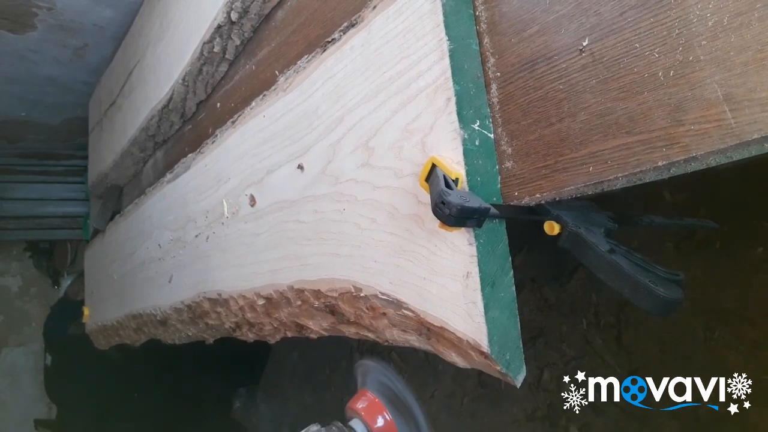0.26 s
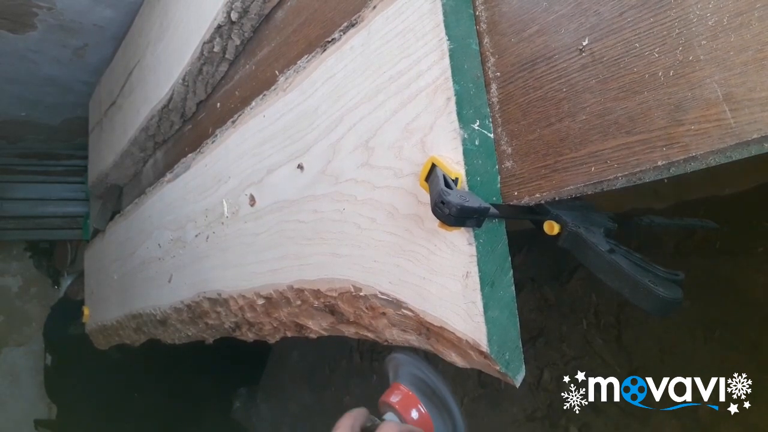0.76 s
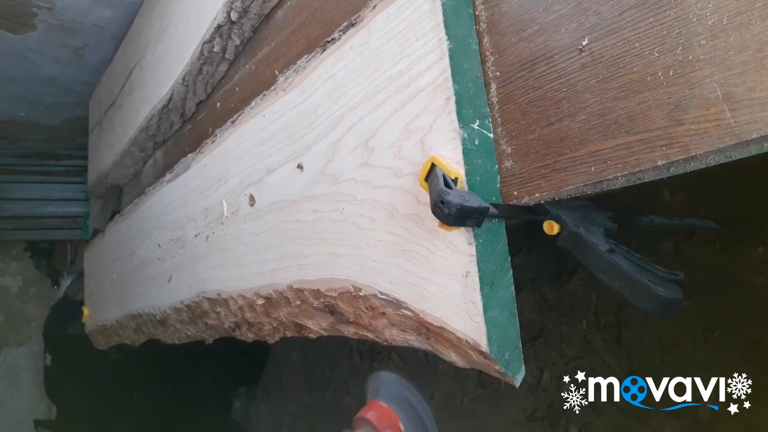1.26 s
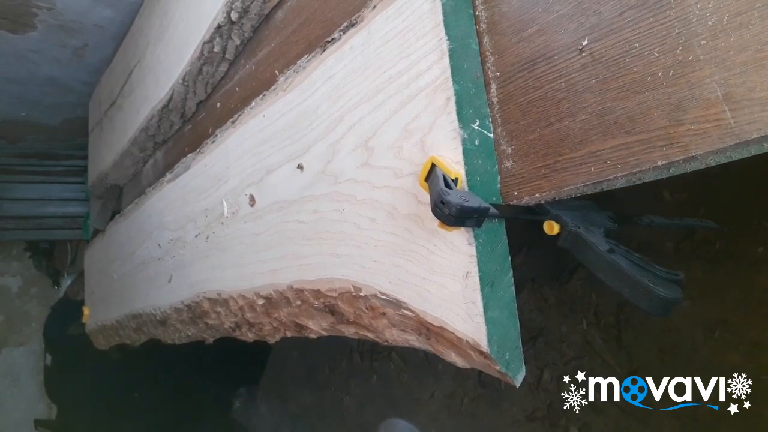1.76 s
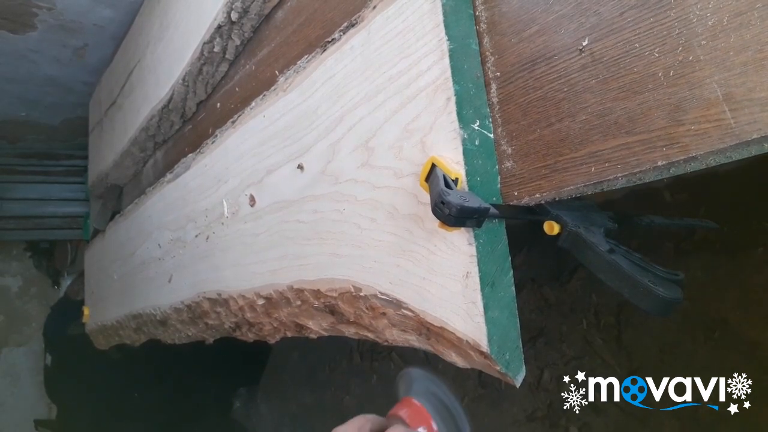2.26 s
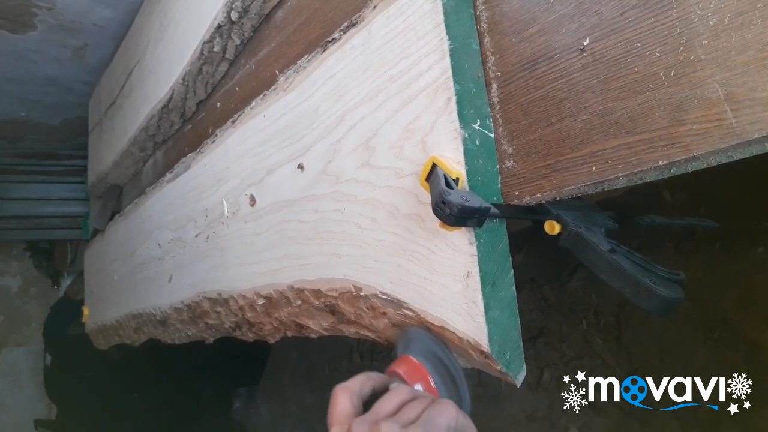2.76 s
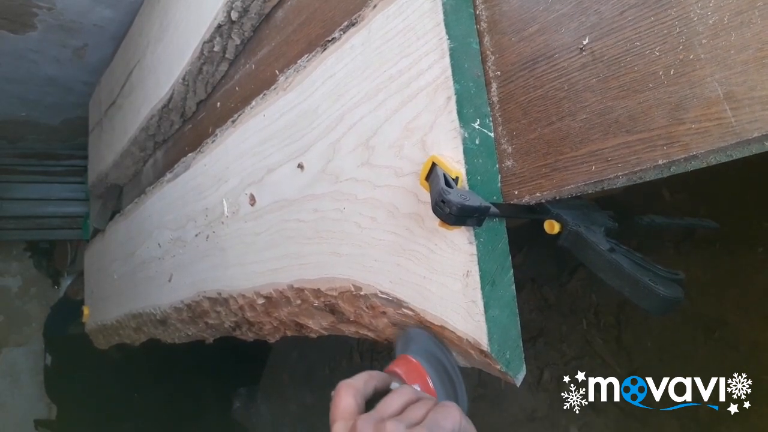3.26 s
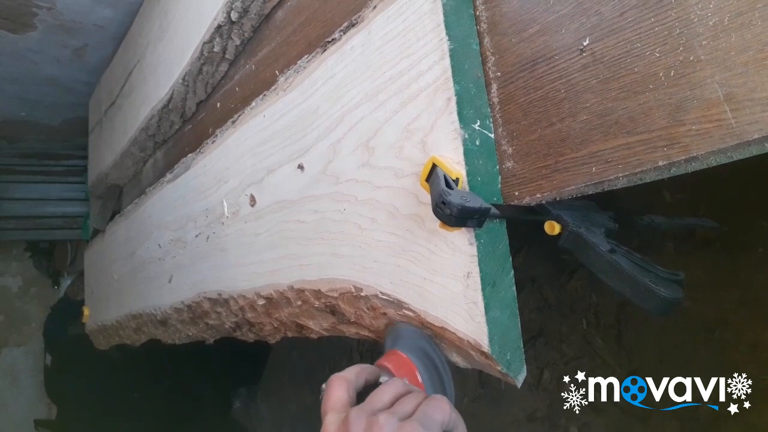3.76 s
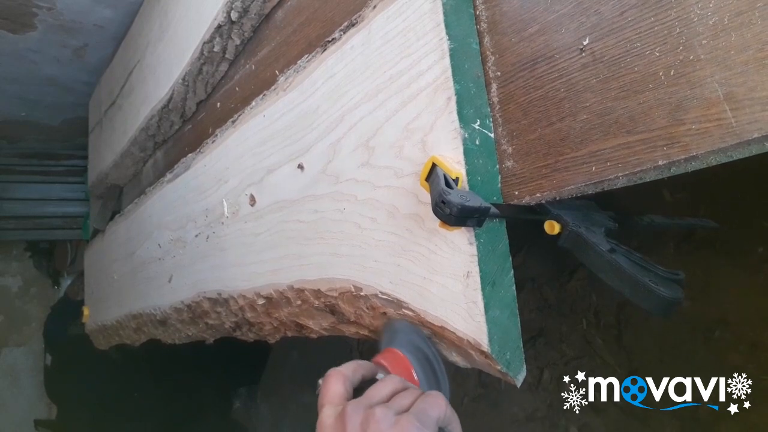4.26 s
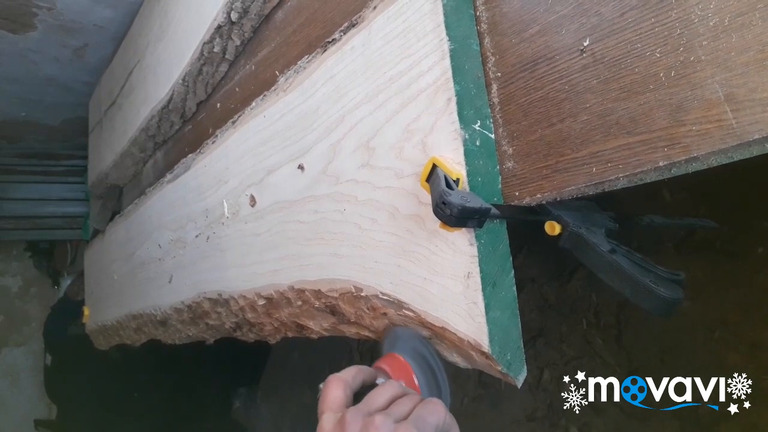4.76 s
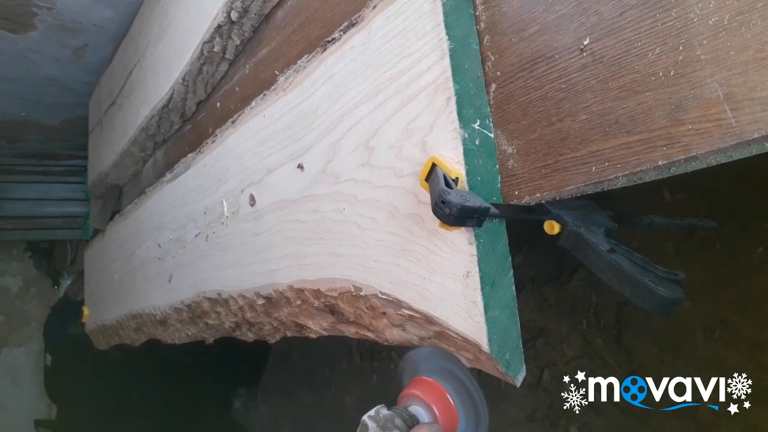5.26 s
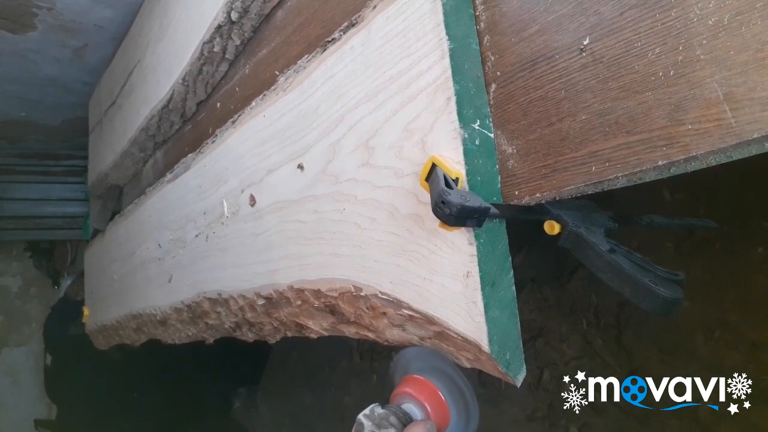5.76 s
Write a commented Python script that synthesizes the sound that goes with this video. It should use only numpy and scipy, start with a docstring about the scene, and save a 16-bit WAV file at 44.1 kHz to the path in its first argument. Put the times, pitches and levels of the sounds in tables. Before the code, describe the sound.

Heard up close in a small workshop, an angle grinder whines, rattles and hisses at full speed. The power cuts and it coasts with a thin falling whistle, then restarts with a short metallic chirp and a quick rise. Its wire brush rasps on a plank's bark edge, catching on lumps and pulling the whine lower. Near the end the brush eases off and the grinder runs on with a fizzing hiss.

```python
"""Angle grinder brushing bark

A small workshop, one mono microphone close to an angle grinder wire-brushing the edge of a clamped plank.
It idles, is switched off and coasts down, snaps back up to speed, slows as the brush bites the bark,
then eases off. One spindle speed drives the gear whine and its rattle, the hum of the brush and
the flutter of fan and wires. Near walls add a short tail."""
import sys
import numpy as np
from scipy import signal
from scipy.fft import rfft, irfft, next_fast_len
from scipy.io import wavfile
from scipy.ndimage import uniform_filter1d, minimum_filter1d, map_coordinates

SR = 44100
rng = np.random.default_rng(int(sys.argv[2]) if len(sys.argv) > 2 else 0)


def output_pcm(signal):
    """Save a mono or channel-first signal as 16-bit PCM at the path in sys.argv[1].

    Samples are clipped to [-1, 1] before scaling.
    """
    pcm = np.clip(np.atleast_2d(signal).T, -1, 1) * 32767
    wavfile.write(sys.argv[1], SR, np.round(pcm).astype(np.int16))


N = 265041

FREE_SPEED = 200  # nominal turns a second with no load
WHEEL_TEETH, PINION_TEETH = 37, 10
ROTOR_RATIO = WHEEL_TEETH / PINION_TEETH  # armature turns per spindle turn
OFF_S, ON_S = .92, 1.885  # the switch is released and pressed again
COAST_DROP_DB, COAST_FADE_S = 8, .24  # effort dies away while coasting
INRUSH_DB, INRUSH_RISE_S, INRUSH_FADE_S = 3, .04, .39  # extra effort of the run-up
GEAR_COAST_SLOPE = 2.4  # dB of whine and rattle lost per dB of effort lost
# laws of level: base level/dB, rise per doubling of speed/dB, dB per dB of effort, change at full load/dB
CASE_LAW = (-28, 5.5, 1.07, 1.47)
FAN_LAW, HISS_LAW = (-38, 5, .55, -.3), (-27, 6, .8, -.6)
BUZZ_LAW, FIZZ_LAW = (-36.5, 6.5, 1.1, 1.2), (-30, 6, .85, 1.2)

# the spindle's course, before the bark makes it waver: t/s, speed/(turns/s)
SPINDLE_SPEED = [(0, 199), (.2, 202.5), (.45, 203.8), (.92, 204.3), (1.5, 128.5), (1.885, 100), (1.92, 121),
                 (2.0, 152), (2.1, 173), (2.3, 195), (2.48, 204), (2.7, 193.5), (2.92, 172), (3.2, 165.6),
                 (3.5, 162.8), (3.77, 165.6), (4.4, 167.7), (4.78, 175.2), (5.15, 175.5), (5.38, 182.8),
                 (5.7, 179), (6.01, 179.1)]
# unbalance of the brush: multiple of spindle speed, base level/dB, change at full load/dB
UNBALANCE = [(1, -67.5, 4.5), (2, -65.5, 9.8), (3, -63, -1), (4, -64, 5.5), (5, -63, 3)]
# booming resonances of tool and plank: f/Hz, width/Hz, gain/dB
BOOM_MODES = [(328, 18, 6.5), (402, 22, 4), (552, 55, 7.5)]
# the hum swells at one multiple: t/s, half length/s, multiple, level/dB
HUM_SWELLS = [(.81, .04, 1, -55.5), (.96, .08, 1, -59), (2.1, .12, 3, -54.5), (2.56, .14, 1, -56.5),
              (2.6, .055, 2, -48.5), (2.77, .06, 3, -51.5), (3.55, .12, 2, -52), (5.43, .06, 3, -50),
              (5.42, .07, 4, -52.5), (5.92, .05, 3, -54), (5.88, .1, 5, -54)]
# the pitch that the vents favour: f/Hz, width/Hz, gain/dB
VENT_MODES = [(13470, 520, 12)]
# steel guard and wires sing briefly: t/s, f/Hz, level/dB, half length/s
SQUEALS = [(1.72, 4220, -46, .08), (1.919, 4370, -27, 0.018), (1.922, 4535, -28.5, 0.021),
           (2.07, 4530, -35, .025), (4.84, 3220, -37, 0.018), (5.02, 3290, -39, 0.033),
           (5.03, 3100, -41, .06), (5.14, 3170, -39, 0.02), (5.378, 3270, -40, 0.035),
           (5.78, 5070, -42, .12), (5.82, 2500, -44.5, 0.22), (5.83, 3250, -43, 0.12)]
# scraping as the wires press on the bark: t/s, level/dB
SCRAPE_LEVEL = [(0, -76), (2.5, -74.5), (2.8, -51), (2.95, -46), (3.5, -46.5), (3.9, -44), (5.02, -44),
                (5.24, -46), (5.28, -67.5), (6.01, -59)]
# the brush catches on lumps of bark: t/s, level/dB
BITES = [(3.015, -39.5), (3.125, -39.5), (3.27, -42), (3.42, -39.5), (3.52, -41.5), (3.62, -39),
         (3.73, -37.5), (3.8, -39), (3.864, -38.5), (3.975, -36), (4.09, -36), (4.26, -35), (4.33, -40),
         (4.425, -36), (4.511, -37), (4.6, -39), (4.7, -40)]
# spectra of brushed bark, fan, windings, vents, carbon brushes and gear case: f/Hz, relative level/dB
BARK_SPECTRUM = [(30, -60), (120, -26), (330, -10), (600, -4), (1000, -4), (1650, 3.5), (2600, -2.5),
                 (5000, 4), (9000, -15), (15000, -14)]
FAN_SPECTRUM = [(25, -60), (60, -43), (110, -27), (240, -14), (320, -13), (420, -10), (540, -6.5),
                (650, -9), (900, -2.5), (1200, 0.5), (1650, 3.5), (2100, -1.5), (3000, -10.5), (6000, -38)]
BUZZ_SPECTRUM = [(40, -60), (200, -33), (600, -8.5), (1500, -14.5), (2300, 0), (3400, 2.5), (4500, -5.5),
                 (7000, -16)]
HISS_SPECTRUM = [(100, -70), (3000, -36), (7500, 2.5), (10000, 4), (11400, 2.5), (13000, 1.5), (14500, -11),
                 (16000, -19.5)]
FIZZ_SPECTRUM = [(1000, -70), (9000, -20), (11500, 0), (13300, 6), (16000, 3)]
CASE_SPECTRUM = [(300, -80), (2500, -57), (3500, -15.5), (4000, -14.5), (4600, -9), (5400, -3), (6300, -1),
                 (7000, 2), (7500, 0.5), (8100, -3), (9000, -10), (10500, -20.5), (14000, -46)]
# the tool's noise swells or sags: t/s, half length/s, case and fan/dB, buzz and hiss/dB, fizz/dB
SURGES = [(.31, .025, -2.5, 2.5, 1), (1.13, .04, 1.8, 0.5, -1), (2.836, 0.021, 1, -0.5, .5),
          (3.36, 0.22, -1.5, -2, -2), (5.012, .03, 0.5, 3.2, 3), (5.08, .02, -1, -3, -2),
          (5.144, 0.018, 0.5, 3, 2), (5.45, .055, -1.5, -0.3, 7), (5.593, 0.051, -1.2, -1.5, 5),
          (5.69, .045, 0, 1, 6), (5.81, 0.035, -1, -2, 5), (5.93, .045, -1.2, 2.3, 8)]
# pitches that the gear housing favours: f/Hz, width/Hz, gain/dB
HOUSING_MODES = [(6135, 40, -2.5), (6322, 50, -1.5), (6485, 80, -1.5), (6625, 30, -3.5), (6760, 25, -2.5),
                 (7460, 40, -6), (7545, 50, -2)]
# backlash rattle under power: t/s, relative level/dB
RATTLE_LEVEL = [(0, -25.5), (.79, -26.5), (.88, -21), (.97, -27), (1.93, -28.5), (2.25, -21), (2.81, -23),
                (3.12, -32), (3.88, -26), (4.2, -24), (4.75, -22), (5.15, -22.3), (5.33, -25), (6, -24.5)]
# ringing of the guard: f/Hz, width/Hz, relative level/dB
GUARD_MODES = [(2387, 32, -2.5), (3144, 47, -9), (3290, 33, -7), (3980, 140, 0), (4220, 180, -3),
               (4450, 30, 2), (4580, 86, -4), (5560, 70, -6.5)]
# tones of the armature: multiple of its speed, level against the gear case law/dB
ARMATURE_LINES = [(2, -31), (3, -25.5), (5, -25.5), (6, -36), (12, -15)]


def amp(db):
    """Decibels to gain."""
    return 10 ** (np.asarray(db) / 20)


def unit(x):
    """Scale to rms 1."""
    return x / np.sqrt(np.mean(x ** 2) + 1e-20)


def curve(rows):
    """Join (time, value) points into one value per sample."""
    return np.interp(np.arange(N) / SR, *np.transpose(rows))


def swell(s, half):
    """A bell curve of height 1 around time s; the half length is its standard deviation."""
    return np.exp(-.5 * ((np.arange(N) / SR - s) / half) ** 2)


def wobble(rate):
    """A smooth random curve of rms 1, rate knots a second."""
    knots = rng.standard_normal(int(N * rate / SR) + 4)
    return unit(map_coordinates(knots, [np.arange(N) * rate / SR]))


def smear(rate):
    """A random complex swing of rms 1, rate knots a second."""
    return (wobble(rate) + 1j * wobble(rate)) / np.sqrt(2)


def ticks(rate, spread_db):
    """Random tiny impacts of unequal size, rate a second."""
    hits = (rng.random(N) < rate / SR) * np.sign(rng.standard_normal(N))
    return hits * amp(spread_db * rng.standard_normal(N))


def throb(angle, depth):
    """A gain that swells once per turn."""
    return 1 + depth * np.cos(angle)


def filtered(x, response):
    """Pass x through a frequency response."""
    size = next_fast_len(N + 8192)
    return irfft(rfft(x, size) * response(np.fft.rfftfreq(size, 1 / SR)), size)[:N]


def coloured(x, spectrum):
    """Shape x by a spectrum and scale it to rms 1."""
    f, db = np.transpose(spectrum)
    return unit(filtered(x, lambda hz: amp(np.interp(np.log(hz + 1), np.log(f), db))))


def resonances(modes, f):
    """Complex response of a set of modes."""
    return sum(amp(db) * 1j * f * width / (hz * hz - f * f + 1j * f * width) for hz, width, db in modes)


def favour(modes, f):
    """Gain of a tone as it glides across a set of modes."""
    return np.sqrt(sum(amp(db) ** 2 / (1 + (2 * (f - hz) / width) ** 2) for hz, width, db in modes))


def level(law, speed, effort_db, load):
    """The dB of one part, following speed, effort and load."""
    base_db, doubling_db, effort_share, load_db = law
    return base_db + doubling_db * np.log2(speed / FREE_SPEED) + effort_share * effort_db + load_db * load


def surges():
    """Passing changes in dB of gear case and fan, of buzz and hiss, and of the fizz."""
    return sum(np.outer(parts_db, swell(s, half)) for s, half, *parts_db in SURGES)


def switch():
    """Power (0-1) and the motor's effort in dB, fading as it coasts and overshooting at the restart."""
    t = np.arange(N) / SR
    since_off, since_on = np.maximum(t - OFF_S, 0), np.maximum(t - ON_S, 0)
    restarted = np.clip(since_on / INRUSH_RISE_S, 0, 1)
    coast_db = -COAST_DROP_DB * (1 - np.exp(-since_off / COAST_FADE_S))
    inrush_db = INRUSH_DB * np.exp(-since_on / INRUSH_FADE_S)
    return (t < OFF_S) + restarted, (1 - restarted) * coast_db + restarted * inrush_db


def workshop(x, t60, wet_db):
    """Close walls return a short dense tail to the microphone; gliding tones flicker through it."""
    t = np.arange(SR // 2) / SR
    tail = rng.standard_normal(len(t)) * amp(-60 * t / t60) * (t > .002)
    wet = signal.fftconvolve(x, tail / np.linalg.norm(tail))[:N]
    return (x + amp(wet_db) * wet) / np.sqrt(1 + amp(wet_db) ** 2)


def brush_hum(angle, speed, effort_db, load):
    """Low underneath, the unbalanced brush shakes tool and plank at the first multiples of its speed."""
    total = np.zeros(N)
    for multiple, base_db, load_db in UNBALANCE:
        k = round(multiple)
        steady_db = level((base_db, 5, .9, load_db), speed, np.minimum(effort_db, 0), load)
        steady = amp(steady_db) * np.hypot(1, favour(BOOM_MODES, k * speed))
        swells = sum(amp(db) * swell(s, half) for s, half, which, db in HUM_SWELLS if round(which) == k)
        roughness = 1 + .12 * k * smear(80)
        shake = np.sqrt(2) * (roughness * np.exp(1j * k * angle)).real
        total += np.hypot(steady, swells) * amp(1.4 * wobble(15)) * shake
    return total


def coast_whistle(angle, speed, powered):
    """With the power off a thin whistle of the rotor falls through the treble."""
    multiple = 32 * ROTOR_RATIO  # 32 cycles per turn of the rotor
    gain = (1 - powered) * np.hypot(1, favour(VENT_MODES, multiple * speed))
    return gain * amp(-43 + 1.8 * wobble(59.7)) * unit(np.sin(multiple * angle + .5 * wobble(300)))


def squeals():
    """Friction sets thin steel singing hoarsely for a moment."""
    t = np.arange(N) / SR
    total = np.zeros(N)
    for s, hz, db, half in SQUEALS:
        hoarse = (.8 + .6 * smear(90)) * np.exp(2j * np.pi * hz * t)
        total += amp(db) * swell(s, half) * unit(hoarse.real)
    return total


def wires(angle, rasp):
    """At the plank's edge loose wires flick the bark at random; the stiffest tuft strikes once a turn."""
    flicks = ticks(rate=9000, spread_db=4) * throb(angle, depth=.14)
    turns = np.floor((angle + .083 * wobble(150)) / (2 * np.pi))
    strikes = np.diff(turns, prepend=turns[0]) * amp(2 * wobble(200))
    # the tuft knocks in the plank's middle range only
    tuft = filtered(strikes, lambda f: (f / 750) ** 4 / (1 + (f / 750) ** 4) / (1 + (f / 1900) ** 4))
    bark = .85 * coloured(flicks, BARK_SPECTRUM) + .55 * coloured(tuft, BARK_SPECTRUM)
    return rasp * amp(wobble(30)) * bark


def motor(angle, speed, effort_db, load):
    """The fan rushes and hisses through the vents; the windings buzz and the carbon brushes fizz."""
    state = speed, effort_db, load
    body_db, rush_db, spark_db = surges()
    kick_db = 5.5 * swell(1.92, half=.028)  # the fan whooshes as the motor jumps to life
    fan_db = level(FAN_LAW, *state) + kick_db + body_db + .73 * wobble(20)
    fan = amp(fan_db) * coloured(rng.standard_normal(N) * throb(angle, depth=.032), FAN_SPECTRUM)
    buzz_db = level(BUZZ_LAW, *state) + rush_db + .86 * wobble(20)
    buzz = amp(buzz_db) * coloured(rng.standard_normal(N), BUZZ_SPECTRUM)
    air = ticks(rate=14000, spread_db=4) * throb(angle, depth=.037)
    hiss = amp(level(HISS_LAW, *state) + rush_db) * coloured(air, HISS_SPECTRUM)
    mains = 2 * np.pi * 100 * np.arange(N) / SR
    sparks = ticks(rate=9000, spread_db=2.5) * throb(mains, depth=.15)
    fizz = amp(level(FIZZ_LAW, *state) + spark_db) * coloured(sparks, FIZZ_SPECTRUM)
    return fan + buzz + amp(.81 * wobble(30)) * (hiss + fizz)


def gear_whine(angle, speed, effort_db):
    """Meshing teeth give a clean whistle whenever their rate meets a pitch of the housing."""
    whine_db = -24 + GEAR_COAST_SLOPE * np.minimum(effort_db, 0)
    tone = np.sqrt(2) * np.sin(WHEEL_TEETH * angle + .22 * wobble(60))
    return amp(whine_db + wobble(25)) * favour(HOUSING_MODES, WHEEL_TEETH * speed) * tone


def gear_rattle(angle, effort_db, load):
    """Free teeth bounce in their backlash and smear the whine; load presses it into narrow sidebands."""
    rattle_db = curve(RATTLE_LEVEL) - 1.2 + GEAR_COAST_SLOPE * np.minimum(effort_db, 0)
    tooth = WHEEL_TEETH * angle
    loose = .82 * smear(600) * np.exp(-1j * angle) + .91 * smear(1300)
    # the wheel runs slightly out of true: sidebands lie one turn rate apart
    sidebands = zip((-2, -1, 1, 2), (-12, -4, -5, -13))
    tight = sum(amp(db) * (.6 + .8 * smear(45)) * np.exp(1j * k * angle) for k, db in sidebands)
    tight_share = np.clip(.12 + .68 * load, 0, 1)
    bounce = (np.sqrt(1 - tight_share) * loose + np.sqrt(tight_share) * tight) * np.exp(1j * tooth)
    overtone = amp(-11) * load * smear(1100) * np.exp(2j * tooth)
    rattle = amp(rattle_db + wobble(22)) * np.sqrt(2) * (bounce + overtone).real
    return filtered(rattle, lambda f: 1 + resonances(HOUSING_MODES, f))


def gear_case(angle, speed, effort_db, load):
    """Up front, dense metal impacts ring the gear case and guard; the armature adds faint tones."""
    case_db = level(CASE_LAW, speed, effort_db, load) + surges()[0]
    knocks = ticks(rate=18000, spread_db=2.5) * throb(angle, depth=.11)
    guard = unit(filtered(ticks(rate=5000, spread_db=4), lambda f: resonances(GUARD_MODES, f)))
    guard_db = .24 * case_db - 32.5  # the guard rings on even while coasting
    rotor = angle * ROTOR_RATIO
    armature = sum(amp(db) * np.sqrt(2) * np.sin(round(k) * rotor + .6 * wobble(30))
                   for k, db in ARMATURE_LINES)
    clatter = amp(7 + .83 * wobble(25)) * coloured(knocks, CASE_SPECTRUM)
    return amp(case_db) * (clatter + armature) + amp(guard_db) * guard


def scene():
    """The grinder and its room at the microphone; the scraping sets how hard the brush is loaded."""
    scrape = amp(curve(SCRAPE_LEVEL))
    load = scrape / scrape.max()
    bites = sum(amp(db) * swell(s, half=.018) for s, db in BITES)
    # each bite brakes the spindle a little, and the speed wavers as the brush rides the rough edge
    braking = .013 * (bites / bites.max() - .35 * load) + .003 * load * wobble(22)
    speed = curve(SPINDLE_SPEED) * (1 - braking)
    angle = 2 * np.pi * np.cumsum(speed) / SR
    powered, effort_db = switch()
    state = speed, effort_db, load
    noises = gear_case(angle, *state) + motor(angle, *state) + wires(angle, scrape + bites)
    gear = gear_whine(angle, speed, effort_db) + gear_rattle(angle, effort_db, load)
    tones = gear + brush_hum(angle, *state) + coast_whistle(angle, speed, powered) + squeals()
    mono = workshop(noises, t60=.083, wet_db=-8) + workshop(tones, t60=.18, wet_db=-10)
    return np.array([mono, mono])


def record(dry):
    """After the microphone: the level dips for an instant, a fast limiter holds peaks, the top is cut."""
    ceiling, top_hz = .5, 15750
    dipped = dry * (1 - .7 * swell(5.268, half=.0025))
    needed = np.minimum(1, ceiling / (np.abs(dipped).max(axis=0) + 1e-9))
    gain = uniform_filter1d(minimum_filter1d(needed, size=65), size=65)
    return np.array([filtered(side, lambda hz: hz < top_hz) for side in dipped * gain])


dry = scene()
out = record(dry)
output_pcm(out)
```